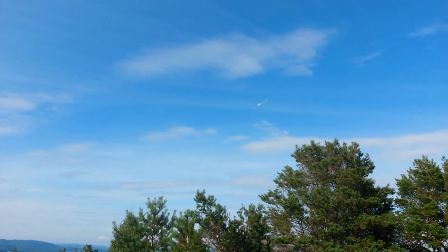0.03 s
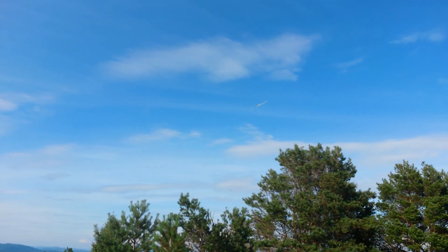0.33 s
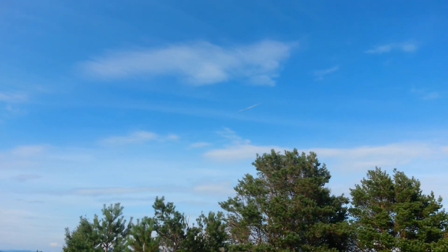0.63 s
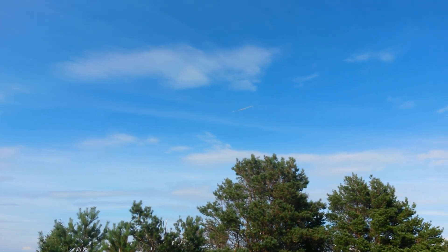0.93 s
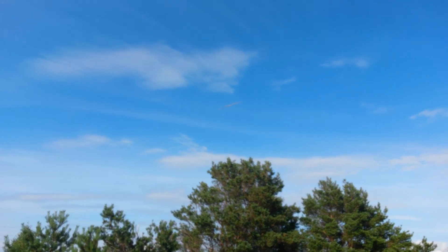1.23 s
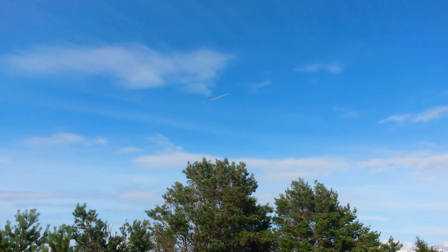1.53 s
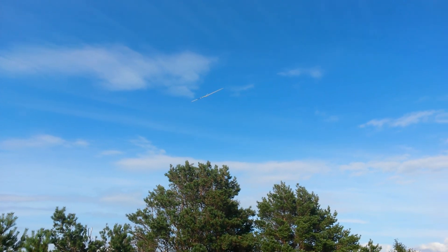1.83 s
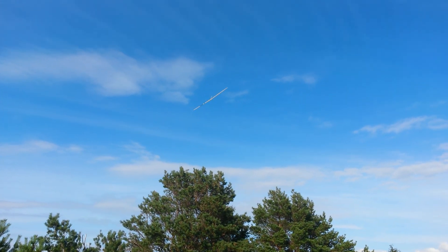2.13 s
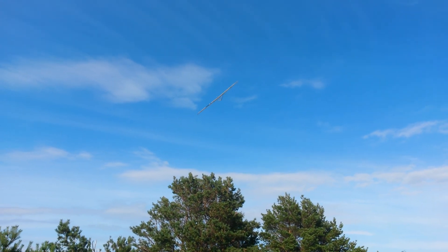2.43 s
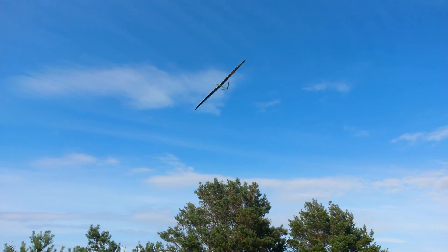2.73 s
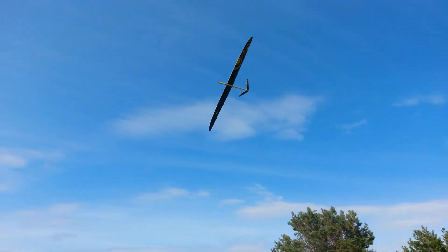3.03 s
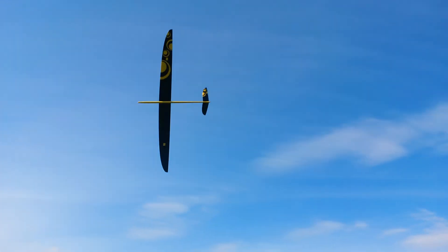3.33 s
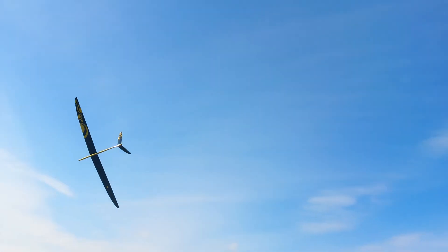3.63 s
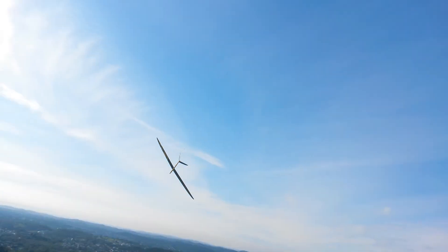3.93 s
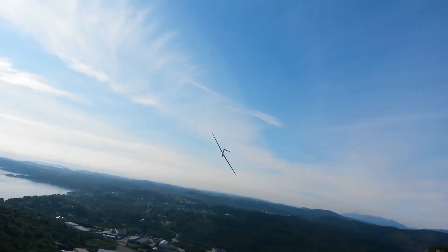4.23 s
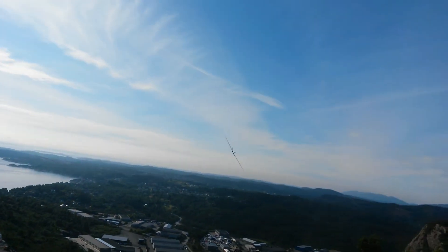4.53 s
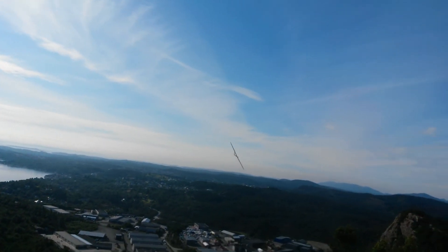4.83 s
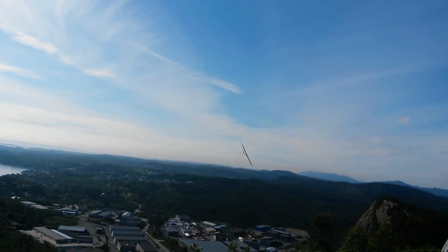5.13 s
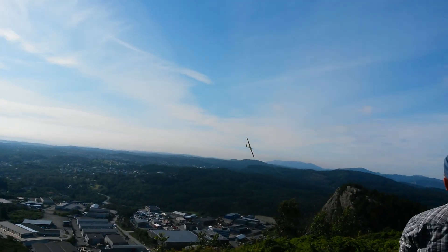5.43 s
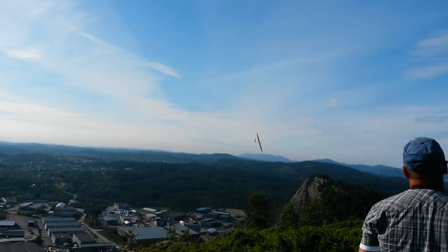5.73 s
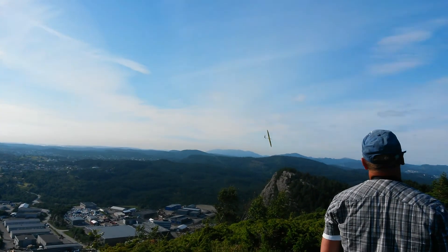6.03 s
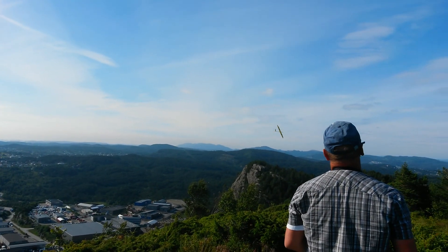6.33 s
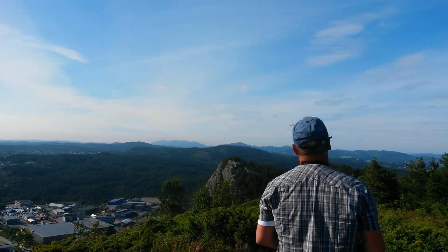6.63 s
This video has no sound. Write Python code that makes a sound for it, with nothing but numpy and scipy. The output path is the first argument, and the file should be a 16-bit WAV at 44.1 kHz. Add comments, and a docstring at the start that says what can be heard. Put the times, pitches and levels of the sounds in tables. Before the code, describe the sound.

Gusty wind rumbles on the microphone as a model glider swooshes past with a light whistle, over faint distant bird chirps.

```python
"""Gusts buffet both microphone ports on a hilltop, over a breeze that hisses in the pines and murmurs
in the valley. A small bird chirps far off and clothes rustle. A model glider sings as it dives closer,
swooshes past and sails away over the valley: air rushing over its wings makes the roar and hiss,
and the gaps of its control surfaces hoot and whistle."""
import sys
import numpy as np
from scipy import signal
from scipy.fft import rfft, irfft, next_fast_len
from scipy.io import wavfile
from scipy.ndimage import uniform_filter1d, map_coordinates

SR = 44100
rng = np.random.default_rng(int(sys.argv[2]) if len(sys.argv) > 2 else 0)


def log_audio(samples):
    """Write samples as a 16-bit WAV file to the path given in sys.argv[1]."""
    # one column per channel
    frames = np.atleast_2d(samples).T
    # limit to full scale, then quantise
    limited = np.clip(frames, -1, 1)
    pcm = np.round(limited * 32767).astype(np.int16)
    wavfile.write(sys.argv[1], SR, pcm)


N = 304290
T = np.arange(N) / SR
TURNED = np.clip((T - 2.6) / 1.1, 0, 1)  # the microphone swings from the pines (0) to the valley (1)


def amp(db):
    """Decibels to gain."""
    return 10 ** (np.asarray(db) / 20)


def unit(x):
    """Scale to rms 1."""
    return x / np.sqrt(np.mean(x ** 2) + 1e-20)


def along(points, hz):
    """Read a curve of (Hz, value) points on a log frequency axis."""
    freqs, values = np.transpose(points)
    return np.interp(np.log(hz + 1), np.log(freqs + 1), values)


def automation(points):
    """Join (seconds, value) points into one value per sample."""
    times, values = np.transpose(points)
    return np.interp(T, times, values)


def wobble(rate):
    """A smooth random curve with `rate` knots a second."""
    return map_coordinates(rng.standard_normal(int(N * rate / SR) + 4), [T * rate])


def swell(start, hold, attack, release):
    """Full level from `start` for `hold` seconds; attack and release are seconds per 20 dB."""
    return amp(-20 * (np.maximum(start - T, 0) / attack + np.maximum(T - start - hold, 0) / release))


def filtered(x, response):
    """Equalise x with a gain given as a function of Hz."""
    size = next_fast_len(N + SR // 2)
    return irfft(rfft(x, size) * response(np.fft.rfftfreq(size, 1 / SR)), size)[..., :N]


def pan(db):
    """Constant-power gains with the left `db` above the right."""
    gains = amp(np.array([np.atleast_1d(db), -np.atleast_1d(db)]) / 2)
    return gains / np.sqrt(np.mean(gains ** 2, axis=0))


def rush(spectrum, alike, patchy_db):
    """Stereo noise of rms 1 with patches of random gain; `alike` is (Hz, left-right correlation)."""
    def mid_side_gains(hz):
        width = np.arccos(np.clip(along(alike, hz), -1, 1)) / 2
        return amp(along(spectrum, hz)) * [np.cos(width), np.sin(width)]

    bins = signal.stft(rng.standard_normal((2, N)), nperseg=1024)[2]
    patches = uniform_filter1d(rng.standard_normal(bins.shape[1:]), size=4, axis=0)
    patches = uniform_filter1d(patches, size=8, axis=1)
    noise = signal.istft(bins * amp(patchy_db * unit(patches)), nperseg=1024)[1][:, :N]
    mid, side = filtered(noise, mid_side_gains)
    return unit(np.array([mid + side, mid - side]))


def varispeed(x, speed):
    """Read x at a changing speed, so that all its pitches follow."""
    clock = np.cumsum(speed * np.ones_like(x), axis=1)
    return np.array([map_coordinates(side, [at], mode="mirror") for side, at in zip(x, clock)])


def bearing_delay(x, lag_ms):
    """A sound from the right reaches the left port later."""
    left = map_coordinates(x[0], [(T - lag_ms / 1000) * SR], mode="nearest")
    return np.array([left, x[1]])


# The colour of the microphone ports. Each row: frequency in Hz, left over right in dB.
PORT_COLOUR = [(400, -1.5), (1000, 4), (2200, 1), (3300, 6), (4700, 18), (6500, 3), (9000, -3.5),
               (12500, -11.5), (15500, -5)]
def ports(x, share=1):
    """Each port's cavity colours near sounds in its own way; diffuse ones take a smaller share."""
    return filtered(x, lambda hz: pan(share * along(PORT_COLOUR, hz)))


# The valley's dark bed and the pines' airy top. Each row: frequency in Hz, relative level in dB.
VALLEY_SPECTRUM = [(120, -2), (200, -0.5), (450, -3), (700, -4.5), (1000, -4.5), (1400, -10.5), (3000, -24),
                   (6000, -75)]
PINE_SPECTRUM = [(500, -18), (1800, 0.5), (3000, 0.5), (4800, 1), (6500, -2.5), (9000, -3), (12500, -1.5),
                 (15500, -3)]
# The breeze's rise and fall, which also drives the buffeting. Each row: time in seconds, dB over calm.
BREEZE_STRENGTH = [(0, 3), (.36, 8), (1.02, 9.5), (1.12, 2.5), (1.42, 0), (1.6, 3.5), (1.7, -.5), (2.9, 2),
                   (3.9, 7.5), (4.4, 5.5), (5.08, 5), (5.3, 7.5), (5.55, 0.5), (5.95, 2), (6.33, 7),
                   (6.48, 2), (6.9, 2)]
def breeze():
    """A low murmur from the valley and a fine hiss from the pines swell with the wind."""
    wind_db = automation(BREEZE_STRENGTH)
    murmur = rush(VALLEY_SPECTRUM, [(300, 0.47), (1000, 0.58), (3000, 0.1)], patchy_db=0.77)
    murmur *= amp(-65 + 1.185 * wind_db - 2 * TURNED + 0.7 * wobble(9))
    murmur = bearing_delay(murmur, lag_ms=np.interp(T, [2.8, 4], [0.35, 0.15]))
    hiss = amp(-68.5 + wind_db + 0.15 * wobble(11)) * rush(PINE_SPECTRUM, [(1000, 0.022)], patchy_db=0.5)
    return murmur * pan(1.0) + ports(hiss, share=0.21) * pan(0.4)


# The wind's deep rumble and the flutter on top. Each row: frequency in Hz, relative level in dB.
RUMBLE_SPECTRUM = [(15, -28), (45, -4), (75, 0.5), (105, -0.5), (150, -5.5), (220, -18), (350, -33),
                   (600, -53), (2500, -64)]
FLUTTER_SPECTRUM = [(120, -21), (250, 0.5), (420, -7), (600, -24), (1200, -42), (3000, -90)]
# Gust hits. Each row: start in seconds, hold in seconds, level in dB, left over right in dB.
PORT_GUSTS = [(0.213, .03, -35, -13), (0.286, 0.041, -27.5, -2), (0.344, 0.043, -35, 15),
              (0.419, 0.076, -44, 18.5), (0.551, 0.035, -47, -8), (.64, 0.094, -34.5, 13),
              (0.768, .12, -32.5, 5), (0.91, .025, -26.5, -19), (0.977, 0.039, -35, -15.5),
              (1.297, 0.019, -57.5, -10.5), (1.553, 0.064, -55, -16), (2.611, 0.05, -55, -12),
              (3.144, 0.15, -36.5, -14), (3.263, .065, -33.5, 15), (3.38, 0.042, -39, -17),
              (3.787, 0.029, -43, -19), (3.887, 0.068, -42.5, 16), (4.028, 0.057, -44.5, -6),
              (4.373, 0.099, -50.5, 13), (4.65, 0.055, -49, 8), (4.987, 0.029, -46, -17.5),
              (5.16, .12, -40.5, -18), (5.3, 0.094, -45, -6), (5.692, 0.078, -55, -11.5),
              (6.092, 0.021, -47.5, -16), (6.26, 0.1202, -51, -5.5), (6.628, 0.3, -60, -8.5)]
def buffeting():
    """Each port has its own turbulence; faster air sweeps the eddies by at a higher pitch."""
    draught = amp(-68 + 1.9 * automation(BREEZE_STRENGTH) + 2.5 * TURNED) * pan(-2.467)
    gust_power = sum((amp(db) * pan(side_db) * swell(start, hold, attack=0.03057, release=0.04)) ** 2
                     for start, hold, db, side_db in PORT_GUSTS)
    strength = np.sqrt(draught ** 2 + gust_power)
    facing = np.interp(TURNED, [0, 1], [1.04, 0.86])  # air crosses the ports slower after the turn
    airspeed = facing * (strength / amp(-44) + 0.2) ** 0.11
    rumble = varispeed(rush(RUMBLE_SPECTRUM, [(100, 0.018)], patchy_db=0.97), airspeed)
    local_power = np.abs(uniform_filter1d(rumble ** 2, size=2200))
    rumble = unit(rumble / np.sqrt(local_power + 0.032))  # evens out the eddies' sizes
    buffets = strength * unit(rumble * amp(2.16 * np.array([wobble(40), wobble(40)])))
    crests = np.clip(rumble, 0, 2) ** 1.4  # in hard gusts, small eddies break off each big one's crest
    flutter_gain = amp(-43) * crests * (strength / amp(-28)) ** 2.07
    return buffets + flutter_gain * rush(FLUTTER_SPECTRUM, [(100, 0.02)], patchy_db=1.0)


# Single wind thumps. Each row: centre in seconds, peak level in dB, left over right in dB.
EDDY_HITS = [(.131, -34, -22), (0.309, -22, -7), (.377, -29.5, 14), (.926, -13, -23), (1.01, -29.5, -17),
             (3.276, -26.5, -4), (3.4, -24, -16), (3.895, -29, 18), (4.382, -35, 18), (4.449, -36, 25),
             (5.206, -25, -29), (6.014, -39, -24), (6.17, -38, -18), (6.34, -31, -31)]
def eddies():
    """Single eddies thump a port; stronger ones sweep by faster, so they are shorter and higher."""
    reference_hz, reference_db = 92.6, -29.5
    thumps = np.zeros((2, N))
    for centre, peak_db, side_db in EDDY_HITS:
        hz = reference_hz * amp(peak_db - reference_db) ** 0.16
        cycles = (T - centre) * hz
        swirl = 2 * np.pi * cycles + 0.58 * wobble(3.1 * hz) + rng.uniform(0, 2 * np.pi)
        thumps += amp(peak_db) * pan(side_db) * np.exp(-(cycles / 0.87) ** 2) * np.sin(swirl)
    return thumps


# The distant bird's phrases. Each row: time in seconds, pitch in Hz, level in dB before the echo mix.
BIRD_CHIRPS = [(0.409, 4920, -63), (0.601, 4900, -65.5), (1.205, 4900, -65.5), (1.338, 4960, -71),
               (1.485, 4880, -70), (2.079, 4870, -61.5), (2.219, 4720, -61.5), (2.369, 4800, -62),
               (3.915, 4940, -63.5), (4.06, 4840, -63.5), (4.819, 4920, -59), (4.956, 4845, -58),
               (5.113, 4775, -62.5), (5.531, 4790, -70), (5.659, 4830, -72), (5.795, 4770, -61.5),
               (5.938, 4770, -66), (6.891, 4690, -63.5)]
def bird():
    """Each chirp starts soft and level, swells as it falls and breaks off; the trees scatter an echo."""
    shape_ms = [-45, -35, -15, -6, 3, 11, 17]
    bend = [1.03, 1.03, 1.022, 1.016, 0.992, 0.962, 0.935]
    loudness = [0, 0.25, 0.3, 0.9, 1, 0.65, 0]
    quaver = 1 + 0.008 * wobble(180)
    song = np.zeros(N)
    for time, hz, db in BIRD_CHIRPS:
        age_ms = (T - time) * 1000 * rng.uniform(0.85, 1.3)
        pitch = hz * quaver * np.interp(age_ms, shape_ms, bend) ** rng.uniform(0.55, 1.1)
        song += amp(db) * np.interp(age_ms, shape_ms, loudness) * np.sin(2 * np.pi * np.cumsum(pitch) / SR)
    song *= amp(1.2 * wobble(120))  # moving air makes it flicker
    t = T[:SR // 2]
    build_s, decay_s = 0.065, 0.5
    tail = rng.standard_normal((2, len(t))) * amp(-60 * t / decay_s) * np.minimum(t / build_s, 1)
    echo = signal.fftconvolve(song[None], tail / np.linalg.norm(tail[0]), axes=1)[:, :N]
    return ports(amp(0.9) * song + amp(-8.0) * echo)


# The glider's stereo image. Each row: frequency in Hz, left-right likeness (1 and above is mono).
GLIDER_ALIKE = [(400, 1.25), (1100, 0.9), (2000, 0.5), (4000, 0.26), (9000, -0.1)]
# The dive's hollow resonances. Each row: frequency in Hz, relative level in dB.
DIVE_SPECTRUM = [(700, -40), (950, -9), (1120, 1), (1300, -6.5), (1550, -14.5), (1880, -3), (2300, -16),
                 (4000, -62)]
# Its early swells. Each row: start in seconds, hold in seconds, level in dB.
DISTANT_SWELLS = [(0.415, 0.15, -64.5), (0.79, .1, -67.5)]
def dive():
    """Air over the diving glider sings out twice from afar, then grows steadily as it nears."""
    singing = sum(amp(db) * swell(start, hold, attack=0.25, release=0.27)
                  for start, hold, db in DISTANT_SWELLS)
    nearing = amp(-69) * swell(2.98, 0, attack=2.1, release=0.4)
    return (singing + nearing) * rush(DIVE_SPECTRUM, GLIDER_ALIKE, patchy_db=2)


# The fabric's crisp tone. Each row: frequency in Hz, relative level in dB.
FABRIC_SPECTRUM = [(1500, -26), (3500, -8.5), (4900, 1), (6300, -13), (10000, -15), (12500, -6.5),
                   (15500, -11)]
# Sliding strokes. Each row: start in seconds, hold in seconds, level in dB.
FABRIC_RUBS = [(2.426, 0.091, -69), (2.611, 0.022, -61.5), (2.724, 0.031, -63.5), (3.13, .03, -68),
               (3.223, 0.049, -55), (4.249, 0.36, -68.5), (4.716, 0.19, -67), (5.282, 0.12, -68.5),
               (5.5, 0.447, -75)]
# Sharp snaps. Each row: time in seconds, relative level in dB.
FABRIC_SNAPS = [(2.4915, -40.5), (2.648, -45.5), (2.8732, -37), (3.256, -28.5), (4.7212, -59), (5.355, -38),
                (5.3887, -38.3)]
def clothes():
    """Fabric slides in uneven grains and now and then snaps."""
    strokes = sum(amp(db) * swell(start, hold, attack=0.22, release=0.1)
                  for start, hold, db in FABRIC_RUBS)
    grains = unit(amp(2.3 * wobble(60) + 2.05 * wobble(400)))
    snaps = sum(amp(db - 9.5) * np.exp(-np.abs(T - time - 0.0015) / 0.0013) for time, db in FABRIC_SNAPS)
    return ports((strokes * grains + snaps) * rush(FABRIC_SPECTRUM, [(1000, 0.19)], patchy_db=3.0))


# The swoosh's layers: wing roar before its Doppler shift, trailing-edge hiss and tail sizzle.
# Each row: frequency in Hz, relative level in dB.
ROAR_SPECTRUM = [(210, -48), (350, -29), (409, -20.5), (491, -24), (545, -9), (638, -13), (696, -2),
                 (835, -7), (1180, -1.5), (1380, -14), (1580, -6), (1750, -12), (2100, -11), (2480, -26.5),
                 (2800, -17), (3640, -37), (6160, -120)]
EDGE_SPECTRUM = [(150, 7.5), (350, 3.5), (900, -4), (1600, -0.5), (2200, 1), (2550, -3.5), (3500, 2),
                 (4100, -2), (4900, 2), (5700, -5), (7000, -16.5), (10000, -16), (12500, -9.5),
                 (15500, -23)]
SIZZLE_SPECTRUM = [(3000, -25), (5000, -3), (7000, -3), (10000, -5), (12600, -1), (15500, -7)]
def swoosh(off_axis):
    """Vortices shed by the wings roar ahead; trailing edges hiss loudest abeam; the tail sizzles aft."""
    abeam_s, speed_m_per_s, closest_m = 3.385, 30.7, 12.4  # a straight pass
    past_m = speed_m_per_s * (T - abeam_s)
    nearness = closest_m / np.hypot(closest_m, past_m)
    off_nose_deg = np.degrees(np.arctan2(closest_m, -past_m))
    receding = np.tanh((T - 3.36) / 0.3)  # -1 approaching, +1 leaving
    doppler = 1 / (1 + 0.09 * (receding + 0.6))
    forward_lobe = np.exp(-np.abs((off_nose_deg - 64.4) / 19.4) ** 4)
    wake = amp(-54.5) * nearness ** 1.6  # the weaker roar in all other directions
    roar_gain = np.hypot(amp(-41.5) * nearness * forward_lobe, wake)
    roar = roar_gain * varispeed(rush(ROAR_SPECTRUM, GLIDER_ALIKE, patchy_db=2.0), doppler)
    hiss = amp(-46.5) * nearness ** 3.02 * rush(EDGE_SPECTRUM, GLIDER_ALIKE, patchy_db=2.0)
    aft = 0.5 + 0.5 * np.tanh((off_nose_deg - 89) / 14)
    sizzle = amp(-56.5) * nearness ** 2.2 * aft * rush(SIZZLE_SPECTRUM, GLIDER_ALIKE, patchy_db=3.5)
    banked = swell(2.885, 1.16, attack=0.49, release=0.88)  # it shows its wings only near the hilltop
    return (roar + hiss + sizzle * pan(3.64 * off_axis)) * banked


def edge_tone(hz, jitter, rough):
    """An edge tone of rms 1 that turbulence shakes in pitch (jitter) and strength (rough)."""
    phase = 2 * np.pi * np.cumsum(hz * (1 + jitter * wobble(70))) / SR
    return unit(np.sin(phase) * (1 + rough * wobble(160)))


# Short, fluty accents. Each row: centre in seconds, length in seconds, pitch in Hz, level in dB.
BANKING_HOOTS = [(3.034, 0.16, 770, -53.5), (3.023, 0.069, 1199, -55), (3.145, 0.084, 1204, -45.5),
                 (3.23, .1, 1163, -45), (3.275, 0.072, 675.5, -44.5), (3.29, 0.087, 2008, -50.5),
                 (3.963, 0.14, 713, -61), (3.975, 0.083, 870, -59.5), (4.056, .07, 854, -59),
                 (6.519, 0.11, 715, -68.5), (6.66, .22, 748, -73)]
def hoots():
    """Gaps in the wing hoot briefly as the glider banks."""
    sound = np.zeros(N)
    for centre, length, hz, db in BANKING_HOOTS:
        envelope = np.exp(-(2 * (T - centre) / length) ** 2)
        sound += amp(db) * envelope * edge_tone(hz, jitter=0.00926, rough=0.13)
    return sound


# The close whistle's wavering fall. Each row: time in seconds, pitch in Hz.
WHISTLE_GLIDE = [(3.33, 1308), (3.38, 1258), (3.44, 1233), (3.49, 1247), (3.56, 1230), (3.67, 1254),
                 (3.74, 1239), (3.81, 1170)]
def near_whistle():
    """A gap in the wing sings as it passes, with a weaker tone on either side."""
    hz = automation(WHISTLE_GLIDE)
    tones = edge_tone(hz, jitter=0.00501, rough=0.11)
    tones += amp(-11) * edge_tone(1.095 * hz, jitter=0.00997, rough=0.23)
    tones += amp(-15) * edge_tone(0.97 * hz, jitter=0.0202, rough=0.92)
    envelope = swell(3.385, 0.22, attack=0.15, release=0.28)
    cutoff = swell(0, 3.82, attack=1, release=0.1)
    return tones * amp(-44 + 1.6 * wobble(21.93)) * envelope * cutoff


def far_whistle():
    """A faint two-tone gap whistle sinks as the glider slows over the valley."""
    start_s, start_hz, sag_hz_per_s = 5.3, 1038, 50
    hz = (start_hz - sag_hz_per_s * (T - start_s)) * (1 + 0.008 * wobble(8))
    upper_hz = 1172 * (hz / 1012) ** 0.3
    tones = edge_tone(hz, jitter=0.004, rough=0.16)
    tones += amp(-4.5) * edge_tone(upper_hz, jitter=0.00352, rough=0.22)
    return tones * amp(-74.5 + 2.1 * wobble(7)) * swell(start_s, 1.083, attack=0.23, release=0.33)


def glider():
    """The whole flight at the two ports, swinging off the microphone's axis as it passes."""
    off_axis = np.interp(T, [3.3, 3.55, 4.1], [0, 1, 0.2])
    whistles = (hoots() + near_whistle() + far_whistle()) * pan(4 * off_axis)
    flight = ports(dive() + swoosh(off_axis) + whistles)
    return bearing_delay(flight, lag_ms=0.13 * off_axis)


def scene():
    """Everything heard on the hilltop."""
    return breeze() + buffeting() + eddies() + bird() + glider() + clothes()


def record(dry):
    """A brick-wall low-pass takes off the very top."""
    return filtered(dry, lambda hz: hz < 15600)


dry = scene()
out = record(dry)
log_audio(out)
```